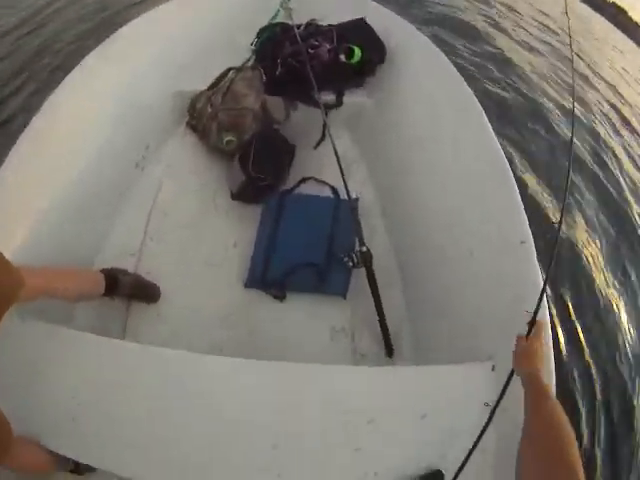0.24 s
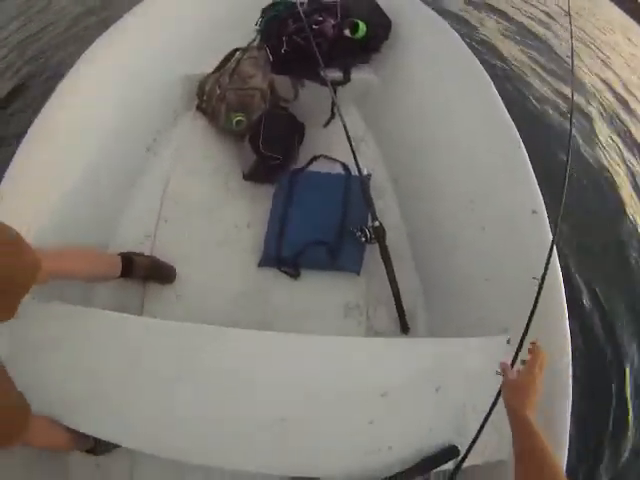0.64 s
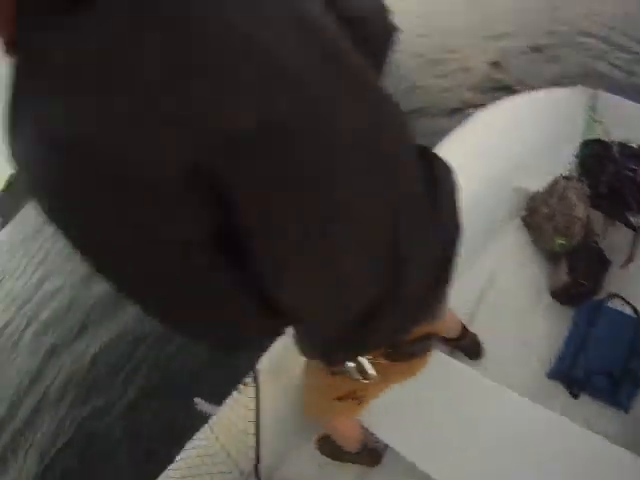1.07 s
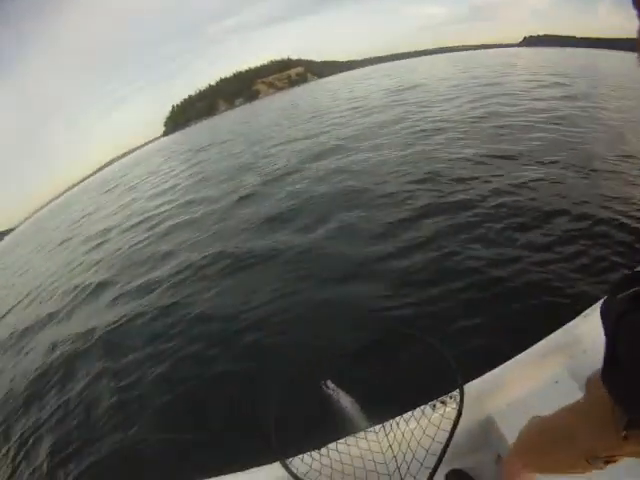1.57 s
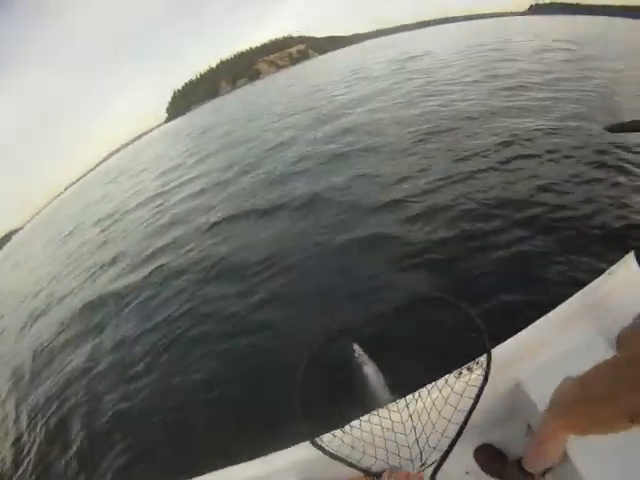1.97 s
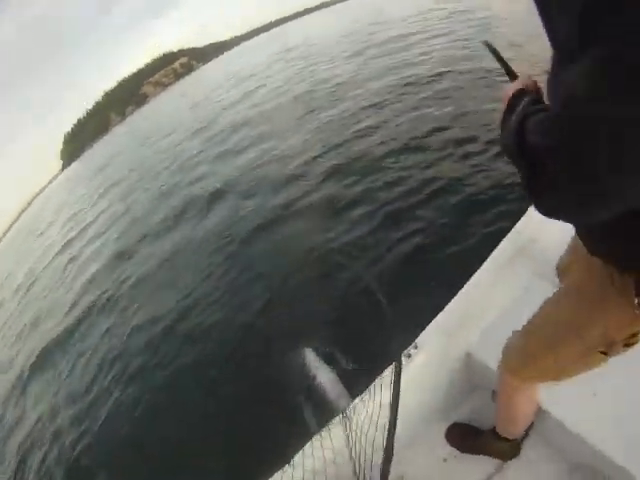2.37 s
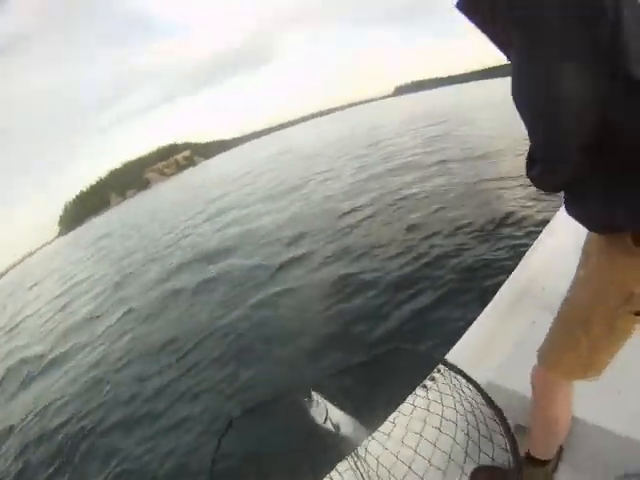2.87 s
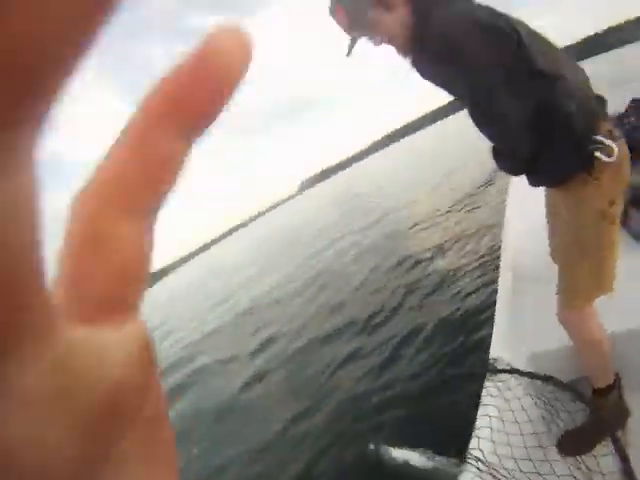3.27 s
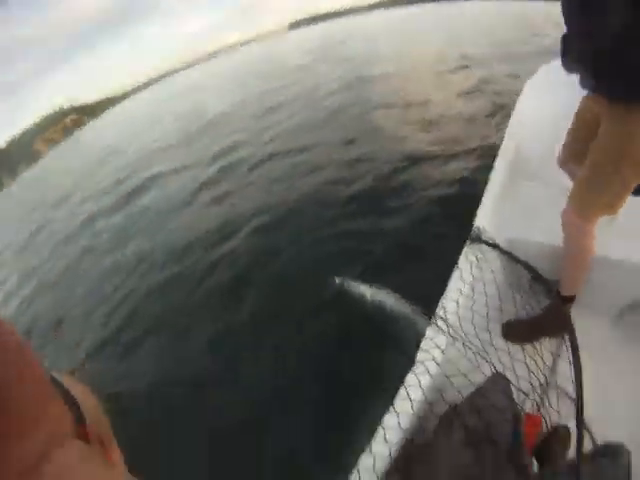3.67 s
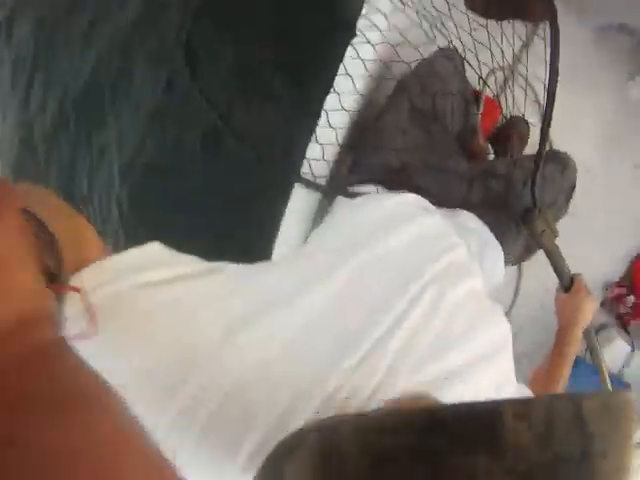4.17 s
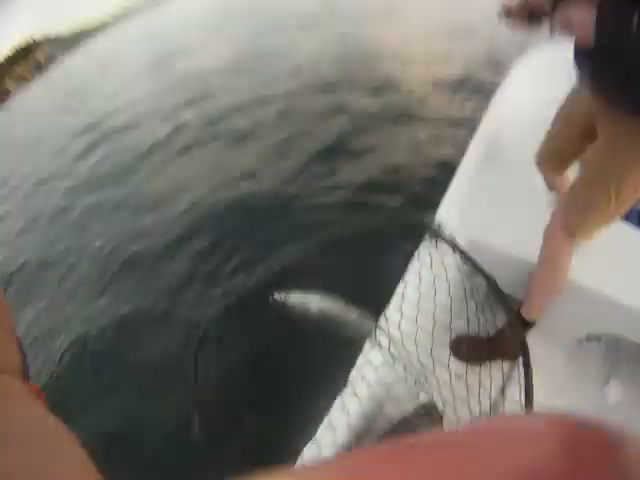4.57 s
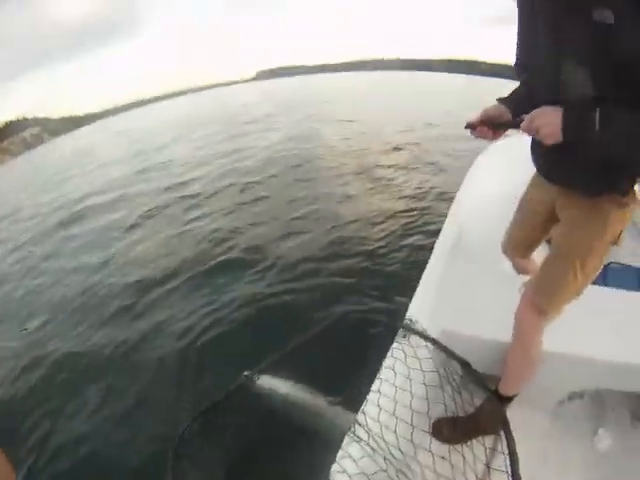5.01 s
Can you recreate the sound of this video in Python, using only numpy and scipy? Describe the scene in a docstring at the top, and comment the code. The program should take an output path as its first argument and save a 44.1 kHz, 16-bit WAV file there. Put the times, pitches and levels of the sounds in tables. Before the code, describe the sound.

Faint hiss and cloth rustle, then from about three seconds a hand loudly knocks and scrapes a plastic camera housing, with deep pressure thuds.

```python
"""On a small boat, a head-worn camera sits in a sealed plastic case. Straps and cloth creak faintly.
Then a hand grips, taps and rubs the case: rough, noisy force makes the modes of its shell ring.
Each squeeze thumps the trapped air, as a smooth push of pressure and a rebound the other way.
Low wind, rumble, hull hum and hiss are shaped noise; the loudest taps clip."""
import sys
import numpy as np
from scipy import signal
from scipy.fft import rfft, irfft, next_fast_len
from scipy.io import wavfile
from scipy.ndimage import uniform_filter1d, map_coordinates

SR = 44100
rng = np.random.default_rng(int(sys.argv[2]) if len(sys.argv) > 2 else 0)


def bounce(signal):
    """Save signal as a 16-bit WAV file at the path given by the first command-line argument."""
    frames = np.transpose(np.atleast_2d(signal))
    limited = np.clip(frames, -1, 1)
    pcm = np.round(limited * 32767).astype(np.int16)
    wavfile.write(sys.argv[1], SR, pcm)


N = 231239  # length in samples


def amp(db):
    """Turn decibels into a gain."""
    return 10 ** (np.asarray(db) / 20)


def unit(x):
    """Scale a sound to an rms (average strength) of 1."""
    return x / np.sqrt(np.mean(np.abs(x) ** 2) + 1e-20)


def curve(rows):
    """Join (seconds, value) points by straight lines, giving one value per sample."""
    seconds, values = np.transpose(rows)
    return np.interp(np.arange(N) / SR, seconds, values)


def wobble(rate):
    """A smooth random curve through `rate` random points a second."""
    points = rng.standard_normal(int(N * rate / SR) + 4)
    return map_coordinates(points, [np.arange(N) * rate / SR])


def filtered(x, response):
    """Multiply the spectrum of x by a response, given as a function of frequency in Hz."""
    size = next_fast_len(N + SR // 2)  # spare room, so that tails do not wrap round to the start
    spectrum = rfft(x, size) * response(np.fft.rfftfreq(size, 1 / SR))
    return irfft(spectrum, size)[..., :N]


def above(x, hz):
    """A second-order high-pass: keep what lies above hz."""
    return filtered(x, lambda f: (1j * f / (hz + 1j * f)) ** 2)


def peak(f, hz, width):
    """The response of one resonance of height 1, which rings only after it is struck."""
    return 1j * f * width / (hz * hz - f * f + 1j * f * width)


def ringing(x, modes, drift_db):
    """Ring x through modes, each drifting in strength as the contact point moves."""
    # scaled so that white noise would keep its rms
    power = sum(amp(db) ** 2 * width for hz, width, db in modes) * np.pi / SR
    total = np.zeros(N)
    for k, (hz, width, db) in enumerate(modes):
        drive = x * amp(db + drift_db * wobble(14))
        ring = filtered(drive, lambda f: peak(f, hz, width))
        total += (-1) ** k * ring  # neighbouring modes have opposite signs
    return total / np.sqrt(power)


def coloured(spectrum):
    """Noise of rms 1 whose spectrum follows (Hz, relative dB) points."""
    hz, db = np.transpose(spectrum)
    noise = rng.standard_normal(N)
    return unit(filtered(noise, lambda f: amp(np.interp(np.log(f + 1), np.log(hz), db))))


# How strongly the wind blows. Each row: time in seconds, level in dB before a small random wobble.
WIND_LEVEL = [(0, -40.5), (.3, -59), (1.6, -55.5), (1.85, -45), (2.0, -48.5), (2.2, -44), (2.5, -51.5),
              (2.9, -41), (3.2, -42.5), (4.1, -26.5), (4.35, -36), (4.65, -25), (5.24, -44)]
# Tone of the wind. Each row: frequency in Hz, relative level in dB per Hz.
WIND_SPECTRUM = [(5, 8.5), (18, 4), (35, 4.5), (60, -19), (100, -28.5), (150, -71.5)]


def wind():
    """Wind is slow pressure: very low noise that swells and sinks."""
    level_db = curve(WIND_LEVEL) + 2.0 * wobble(3.5)
    return amp(level_db) * coloured(WIND_SPECTRUM)


# Modes of the humming hull. Each row: frequency in Hz, width in Hz (of each pass), relative level in dB.
HULL_MODES = [(135.9, 15.3, 0.5), (218, 87, -4)]


def hull_hum():
    """The hull hums: noise passes twice through its modes, which narrows them."""
    once = ringing(rng.standard_normal(N), HULL_MODES, drift_db=-0.5)
    twice = ringing(once, HULL_MODES, drift_db=1.5)
    return amp(-65) * unit(twice)


# Tone of the hiss. Each row: frequency in Hz, relative level in dB per Hz.
HISS_SPECTRUM = [(150, 2), (450, 1.5), (1100, -6), (3800, -13), (7000, -13.5), (15000, -35)]


def hiss():
    """Water and electronics make a nearly steady noise."""
    return amp(-64.0 + 0.43 * wobble(4.1)) * coloured(HISS_SPECTRUM)


TREBLE_DB, TREBLE_PER_DB, TREBLE_LEAST_DB = -6.5, 0.58, -12  # the treble follows the rim, to a least share
FAINT_DB, CRISPER_PER_DB = -40, 0.2226  # contacts fainter than this are light ticks, with more treble


def families(db, knock_db, rim_db):
    """Gains of the four families of modes, in rows: knock, shell, rim and edges (the treble)."""
    treble_db = max(TREBLE_DB + TREBLE_PER_DB * rim_db, TREBLE_LEAST_DB)
    treble_db += CRISPER_PER_DB * max(FAINT_DB - db, 0)
    return amp(db) * amp([[knock_db], [0], [rim_db], [treble_db]])


# Faint rustle of strap and cloth on the case. Each row: time in seconds, relative level in dB.
RUSTLE_LEVEL = [(0, -57), (.15, -70), (.9, -70), (1, -61), (1.5, -70), (2.1, -65.5), (3.2, -62),
                (3.36, -55), (4, -40), (4.1, -64), (4.3, -51.5), (4.5, -49.5), (4.84, -65), (5, -59),
                (5.12, -50.5), (5.17, -80), (5.24, -57)]
# Fingers and cloth sliding on the case, and the rough tails that follow a few taps.
# Each row: time of reaching full strength in seconds, rise in ms (over 30 dB), hold in ms,
# relative level in dB, brightness in dB.
STROKES = [(.006, 11, 51, -53.5, -11.5), (.31, 16, 8.3, -67.5, -15), (1.09, 100, 34, -68, -4),
           (1.258, 72, 4.3, -54.5, -3.5), (1.86, 28, 25, -66, 12), (2.075, 8.7, 30, -56.5, -8.5),
           (2.55, 82, 18, -62, 1), (2.71, 24, 8, -64, -6), (3.064, 6, 5, -33, -13),
           (3.253, 90, 11, -40.5, -2.5), (3.376, 37, 25, -41.5, 3), (3.411, 110, 17, -43, -3),
           (3.463, 45, 12, -24.5, 5), (3.539, 23, 3.3, -24, 6.5), (3.614, 24, 4, -38, 4),
           (3.719, 17, 38, -45, 1.5), (3.813, 33, 35, -40.5, -4), (3.923, 24, 70, -35.5, -2),
           (4.061, 12, 2.5, -48.5, 12), (4.189, 80, 36.5, -25, 4.5), (4.4, 46, 11.5, -24.5, -2.5),
           (4.475, 38, 43, -39, 0), (4.609, 27, 7.9, -25, 8), (4.637, 14, 97, -23.5, 9),
           (4.9, 91, 37, -37, 0), (4.991, 27, 11, -23, 4.5), (5.032, 3.4, 3.7, -21, 2),
           (5.075, 25, 16, -40, 2), (5.233, 37, 8.5, -26.5, 1)]
FALL_MS, SLOWER_MS_PER_DB, FIRM_DB = 44, 1.3, -25  # a firm stroke lets go fast, fainter ones fade longer
DULL_MS_PER_DB = 1.5  # dull strokes die away more slowly too
STROKE_KNOCK_DB, STROKE_RIM_DB, RIM_PER_DB = -5.5, -13, 0.95  # a neutral stroke; brightness trades knock for rim


def stroking():
    """Force of all strokes and rough tails over the faint rustle, one row for each family of modes."""
    ms = np.arange(N) * 1000 / SR
    force = amp(curve(RUSTLE_LEVEL)) * amp([[-8], [0], [-7], [-9]])
    for seconds, rise_ms, hold_ms, db, bright_db in STROKES:
        fainter_db = max(FIRM_DB - db, 0)
        duller_db = max(-bright_db, 0)
        fall_ms = FALL_MS + SLOWER_MS_PER_DB * fainter_db + DULL_MS_PER_DB * duller_db
        late = ms - 1000 * seconds
        rise = late / rise_ms
        fall = (hold_ms - late) / fall_ms
        swell_db = 30 * np.minimum(np.minimum(rise, fall), 0)
        knock_db = STROKE_KNOCK_DB - bright_db
        rim_db = STROKE_RIM_DB + RIM_PER_DB * bright_db
        force += amp(swell_db) * families(db, knock_db, rim_db)
    return force


def rubbing():
    """Skin sticks and slips: grainy force in uneven bunches, with sparse sharper snaps."""
    snaps = (rng.random(N) < 400 / SR) * rng.random(N)  # about 400 a second
    fading_snaps = signal.lfilter([1], [1, -np.exp(-1 / (0.00091 * SR))], snaps)  # each lasts about 1 ms
    bunches = amp(2.3 * wobble(120) + 0.84 * wobble(44) + 0.69 * wobble(900))
    slips = unit(bunches * (1 + 1.07 * fading_snaps))
    return stroking() * slips * rng.standard_normal((4, N))


# Tone of the rumble. Each row: frequency in Hz, relative level in dB per Hz.
RUMBLE_SPECTRUM = [(25, -15), (50, 8), (90, 1), (170, -3), (300, -14.5), (600, -81)]


def rumble():
    """A lumpy low rumble that grows as the hand moves on the case."""
    knock, shell = stroking()[:2]
    motion = uniform_filter1d(np.sqrt(knock * shell), SR // 20)  # averaged over 50 ms
    lumps = unit(amp(5.0 * wobble(21)) * coloured(RUMBLE_SPECTRUM))
    return amp(1.5) * motion ** 0.97 * lumps


# Contacts with the case. Each row: time in seconds, relative peak level in dB, knock share in dB,
# rim share in dB, decay time in ms (60 dB for the main part).
TAPS = [(.015, -31.5, 3, -16.5, 21), (.049, -36.5, -23, -10, 25), (0.4888, -38, -9, -4.5, 66),
        (0.52, -46, -5, -12, 51), (1.02, -44, -17, 4, 28), (1.236, -39.5, -7, -0.5, 28),
        (1.538, -52, -5, 5.5, 27), (2.065, -42, 1, 1, 30), (2.135, -44, -18, -4, 43),
        (2.1786, -48.5, -1, -6.5, 27), (2.289, -42, -10, 5, 23), (2.8508, -47, 2.5, -19, 80),
        (2.8896, -46, -3, -4.5, 37), (3.041, -44, -15, -1, 27), (3.059, -27, -5, 1, 49),
        (3.2129, -35, 2.5, 8.5, 34), (3.252, -44, -1, 7.5, 27), (3.289, -10.5, -7, -7.5, 24),
        (3.3129, -15.5, -4, -19, 26), (3.3905, -19, -2, -32, 12), (3.4325, -12.5, -13.5, -41, 16),
        (3.46, -17, -7.5, -25, 27), (3.528, -24, -5, 0, 13), (3.5481, 6.5, -31, -14.5, 20.7),
        (3.5938, -12, -9.5, -20, 32), (3.6578, -8, -9, -11, 14.6), (3.6841, -22.5, -3.5, -11, 13),
        (3.7745, -23, -1, -3.5, 10), (3.7974, -10.5, -5.5, -12.5, 15), (3.8304, -20.5, -3.5, -29, 25),
        (3.869, -12.5, -18, -4, 7.4), (3.878, 3.5, -7, -2.5, 11.2), (3.9941, 3, 2.5, -7, 8.4),
        (4.003, -17.5, -21, -17, 19), (4.124, -34.5, -5, -2, 7.2), (4.143, -4, 5.5, -16.5, 13),
        (4.165, -20.5, -12, 0.5, 17), (4.351, 2, 0.5, -.5, 11.4), (4.4986, -20.5, -1, -5, 16),
        (4.535, -32, -10, -6, 12), (4.553, -40.5, -22, 5, 9.2), (4.571, -39, -20, 2, 22),
        (4.594, -18, -9, -18, 26), (4.7989, -14.5, -14, -18.5, 5.3), (4.91, -16.5, -12, -20, 15.6),
        (4.9287, -24, 4.5, -14, 19), (4.9574, -15.5, 0.5, -37, 22.4), (5.0323, -2, -14.5, -16.5, 34.3),
        (5.1153, -13.5, -7, -10.5, 14.3), (5.154, -18.5, -17, -4, 4.6), (5.2355, -8.5, -25, -20, 16)]


def tapping():
    """Each contact is a burst of rough force: a very short soft onset, a hold, then a quick decay."""
    force = np.zeros((4, N + SR))
    t = np.arange(SR // 8) / SR
    for seconds, db, knock_db, rim_db, decay_ms in TAPS:
        life = max(decay_ms, 3) / 1000
        onset = np.exp(np.minimum(t - .0035, 0) / 0.0006)
        fall = np.maximum((t - .0035) / life - .13, 0)  # slower contacts also hold longer
        shape = onset * (amp(-60 * fall) + amp(-35 - 12.0 * fall))  # a main part and a faint, slow tail
        burst = shape * rng.standard_normal((4, len(t))) * families(db, knock_db, rim_db)
        start = round((seconds - .003) * SR)
        force[:, start:start + len(t)] += amp(-5) * burst
    return force[:, :N]


# Four families of modes of the case, from low to high.
# Each row: frequency in Hz, width in Hz, relative level in dB.
KNOCK_MODES = [(261, 80, -3), (482, 227, -7.5), (730, 267, -5.5), (1240, 193, -2.5)]
SHELL_MODES = [(1398, 240, -1), (1937, 266, 5.5), (2386, 293, 2.5), (2883, 450, -10)]
RIM_MODES = [(3520, 660, -0.5), (4760, 790, -7.5), (5124, 800, -4.5)]
EDGE_MODES = [(6970, 360, -7.5), (8360, 270, -0.5), (9834, 410, 3), (13920, 700, 2)]


def case():
    """Rubbing and taps ring the same four families of modes; the stiff upper families carry no bass."""
    taps = above(tapping(), 430)  # a brief blow hardly moves the lowest modes
    force = rubbing() + taps
    all_modes = (KNOCK_MODES, SHELL_MODES, RIM_MODES, EDGE_MODES)
    knock, *upper = [ringing(f, modes, drift_db=2.34) for f, modes in zip(force, all_modes)]
    return knock + above(sum(upper), 930)


# Squeezes of the trapped air. Each row: time of the push's middle in seconds, pressure with sign
# (1 is full scale), width of the push in ms.
SQUEEZES = [(2.665, -.012, 4.9), (3.292, -0.64, 5.53), (3.398, -.18, 12.4), (3.451, -0.19, 6.9),
            (3.468, -0.18, 9.4), (3.517, -0.098, 11), (3.537, 0.22, 11.3), (3.66, -0.47, 8.1),
            (3.784, 0.18, 14), (3.802, -0.37, 6.1), (3.994, 0.36, 5.85), (4.1465, 0.64, 4.94),
            (4.355, 0.57, 4.45), (4.443, 0.084, 13), (4.503, -0.25, 9.4), (4.603, 0.14, 11),
            (4.629, .13, 13), (4.713, -0.1, 23), (4.758, 0.79, 6.85), (4.914, .2, 6.9), (4.929, 0.28, 6.2),
            (4.959, -0.11, 2.5), (5.017, 0.16, 12.4), (5.122, -0.58, 7.2), (5.229, -0.076, 7)]
REBOUND_AFTER_PULL, REBOUND_AFTER_PUSH = 1.32, 0.42  # share of the first swing


def squeezes():
    """A push or pull of pressure, then a rebound the other way that leaks off."""
    air = np.zeros(N + SR)
    ms = np.arange(SR // 10) * 1000 / SR
    for seconds, pressure, width_ms in SQUEEZES:
        rebound = REBOUND_AFTER_PUSH if pressure > 0 else REBOUND_AFTER_PULL
        push = np.sin(np.pi * np.clip(ms / width_ms, 0, 1)) ** 2
        u = np.maximum(ms / width_ms - .62, 0) / 0.32  # the rebound is strongest at u = 1
        back = u ** 2 * np.exp(2 * (1 - u))
        start = round((seconds - width_ms / 2000) * SR)
        air[start:start + len(ms)] += pressure * (push - rebound * back)
    return air[:N]


def scene():
    """Everything reaches one microphone inside the case."""
    return (wind() + hull_hum() + hiss() + rumble() + case() + squeezes())[None]


# The sealed port cancels some treble. Each row: frequency in Hz, width in Hz, depth from 0 to 1.
PORT_NOTCHES = [(5950, 1300, .97), (11480, 700, 1), (12660, 3700, 0.46)]
ROLL_HZ, TOP_HZ = 15300, 16050  # the treble drops by 26 dB at the first and ends at the second


def record(dry):
    """Port notches, hard clipping, a treble roll-off and the band limit."""
    def port_response(f):
        return np.prod([1 - depth * peak(f, hz, width) for hz, width, depth in PORT_NOTCHES], axis=0)

    port = filtered(dry, port_response)
    clipped = port / (1 + np.abs(port) ** 10) ** (1 / 10)  # bends sharply just below full scale
    return filtered(clipped, lambda f: (f < TOP_HZ) * np.where(f < ROLL_HZ, 1, amp(-26)))


dry = scene()
out = record(dry)
bounce(out)
```